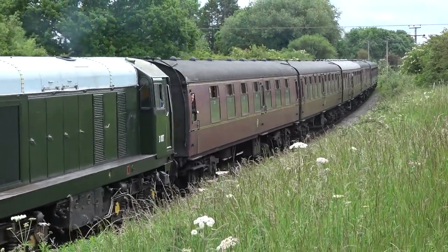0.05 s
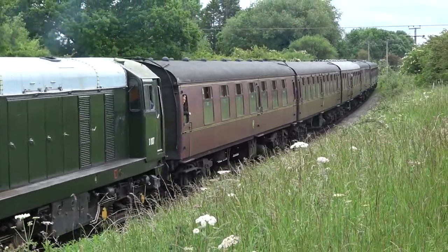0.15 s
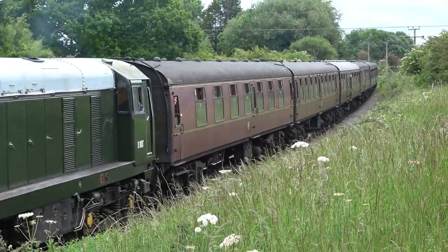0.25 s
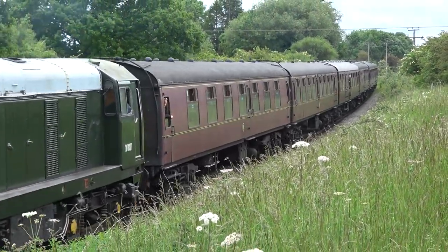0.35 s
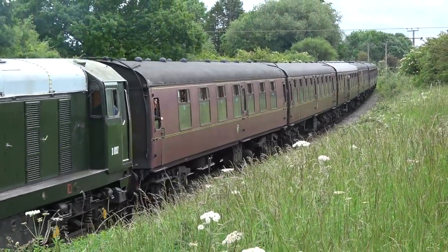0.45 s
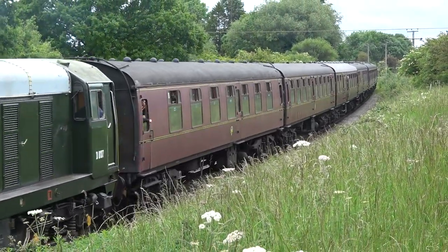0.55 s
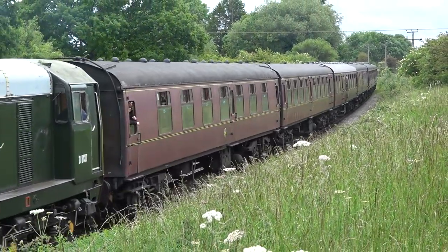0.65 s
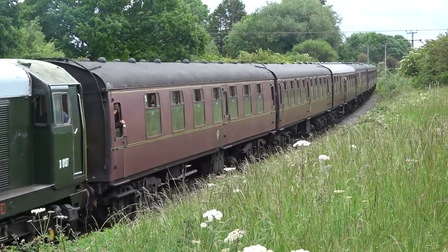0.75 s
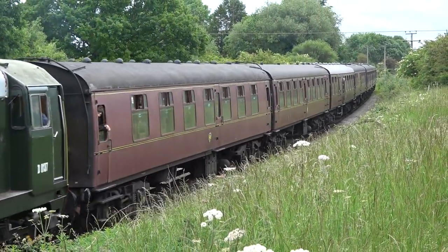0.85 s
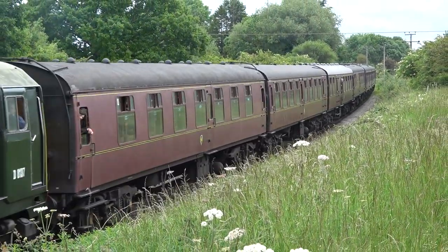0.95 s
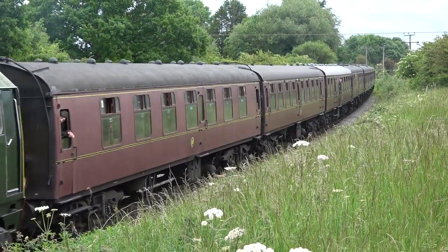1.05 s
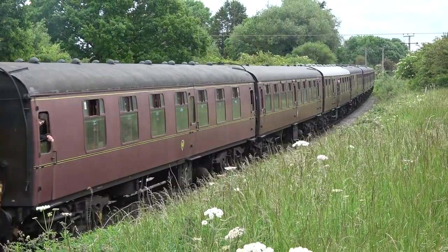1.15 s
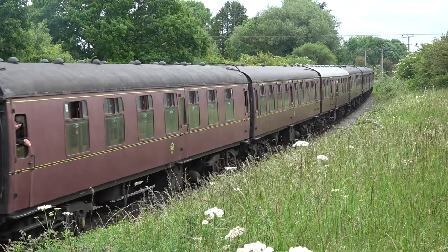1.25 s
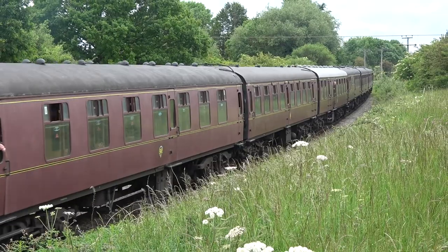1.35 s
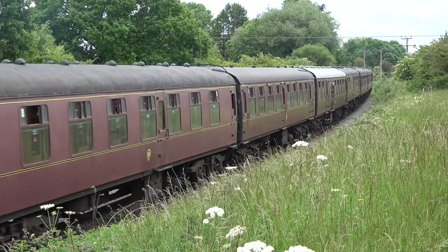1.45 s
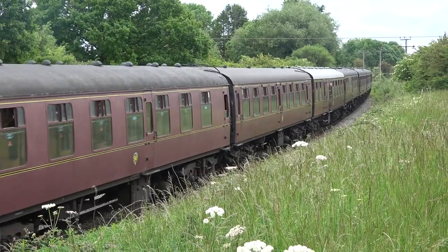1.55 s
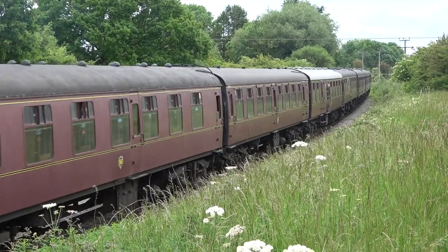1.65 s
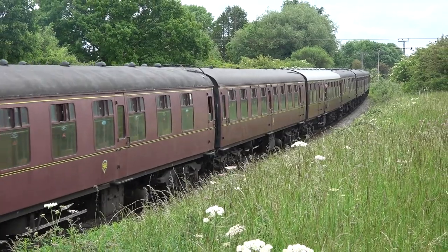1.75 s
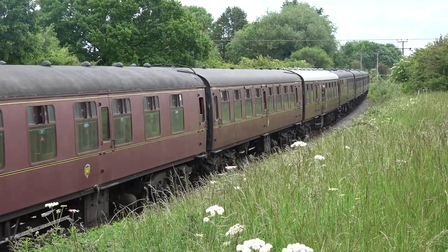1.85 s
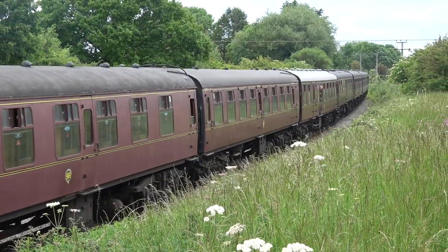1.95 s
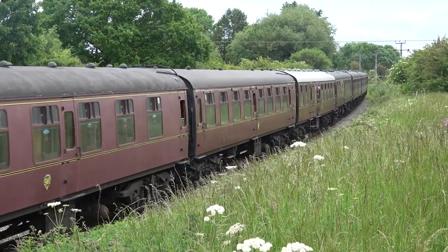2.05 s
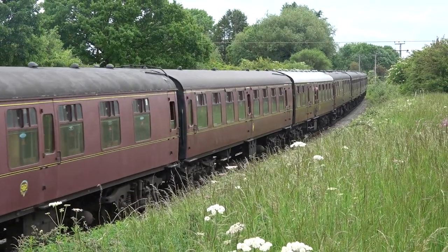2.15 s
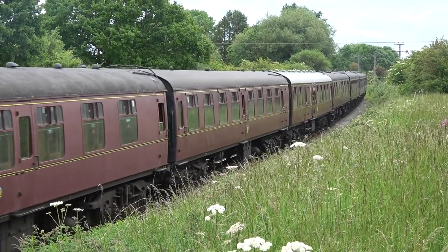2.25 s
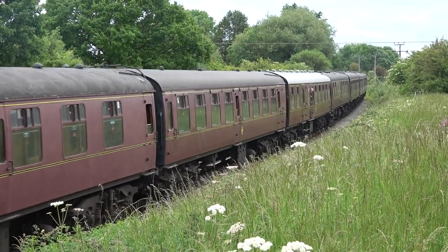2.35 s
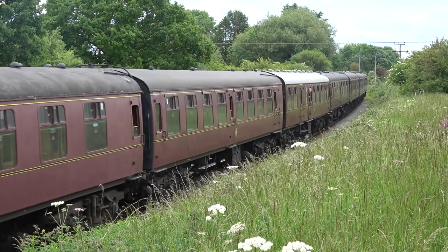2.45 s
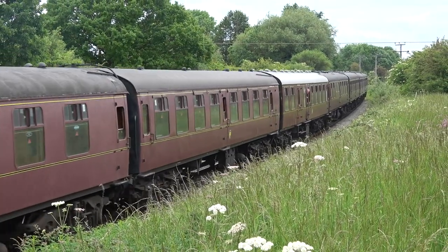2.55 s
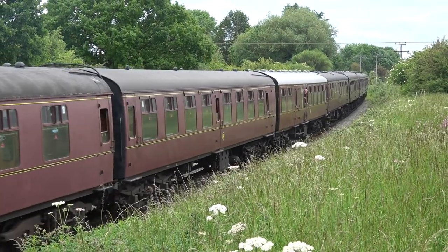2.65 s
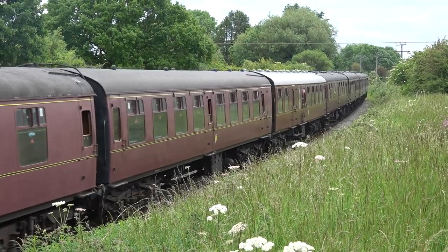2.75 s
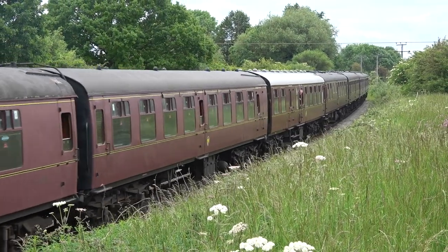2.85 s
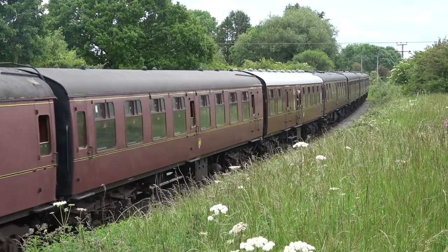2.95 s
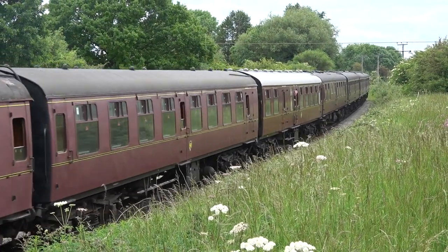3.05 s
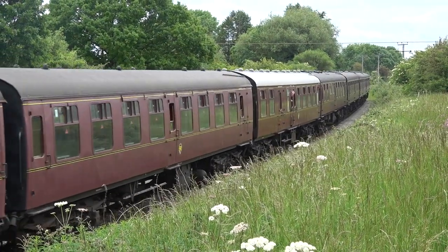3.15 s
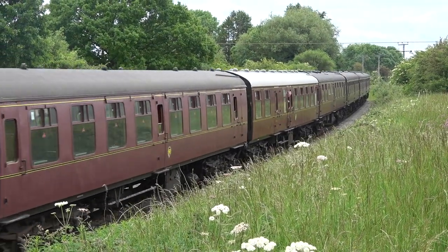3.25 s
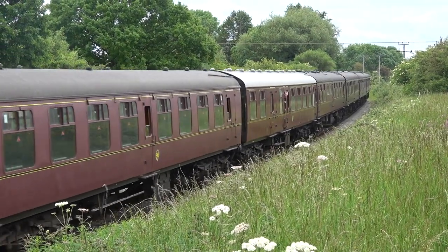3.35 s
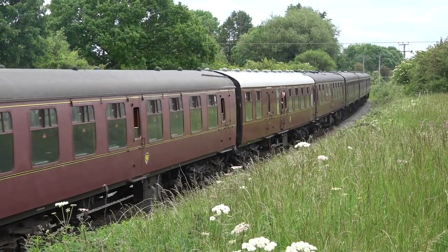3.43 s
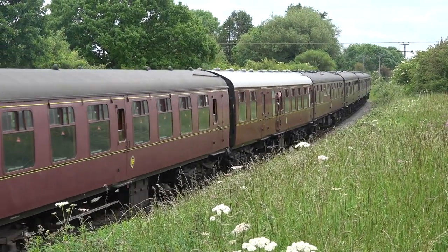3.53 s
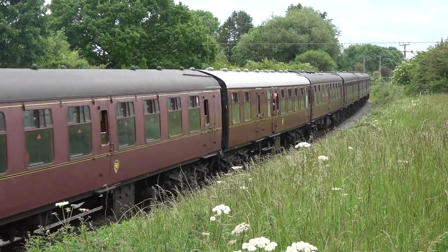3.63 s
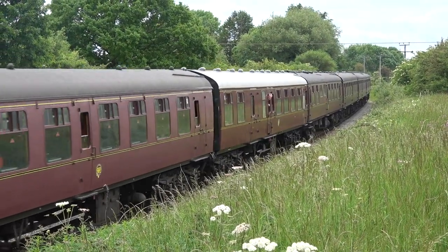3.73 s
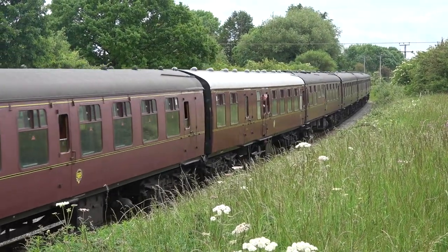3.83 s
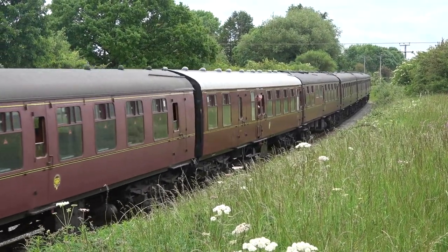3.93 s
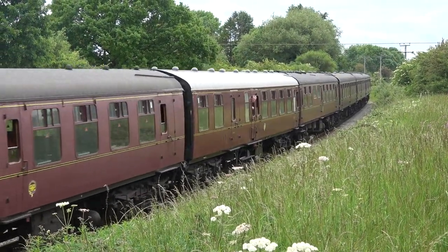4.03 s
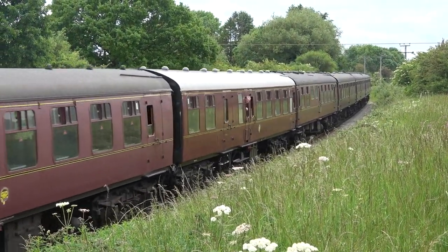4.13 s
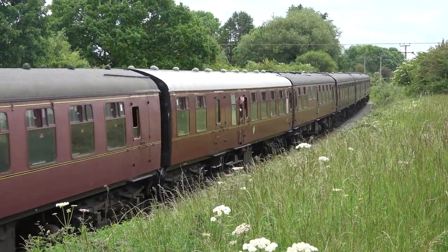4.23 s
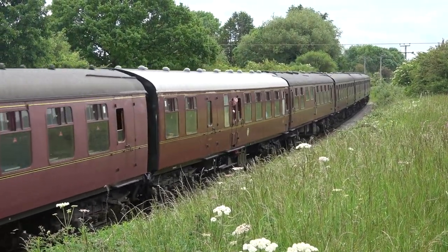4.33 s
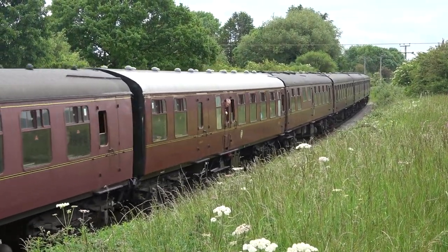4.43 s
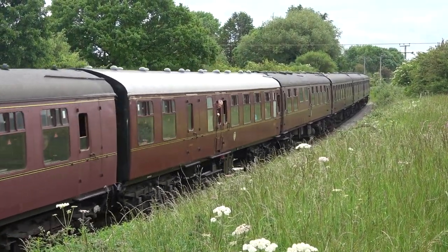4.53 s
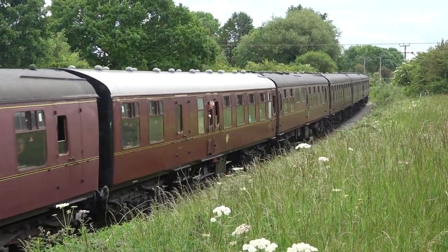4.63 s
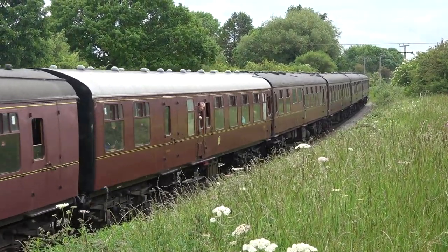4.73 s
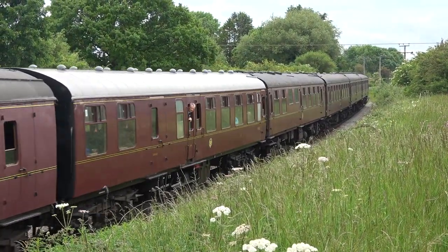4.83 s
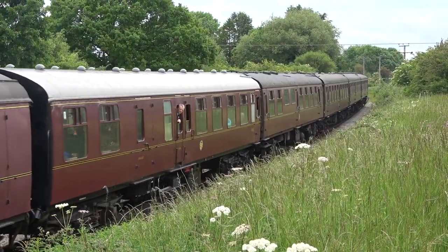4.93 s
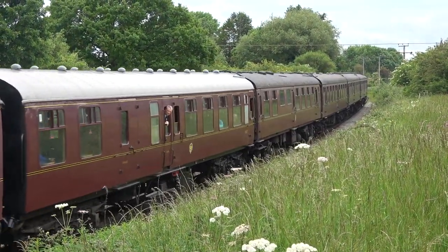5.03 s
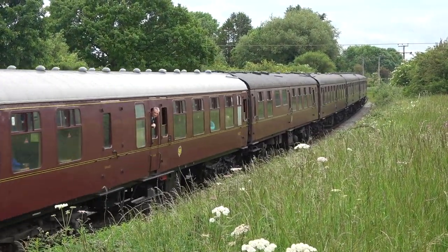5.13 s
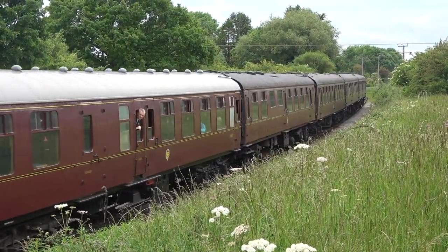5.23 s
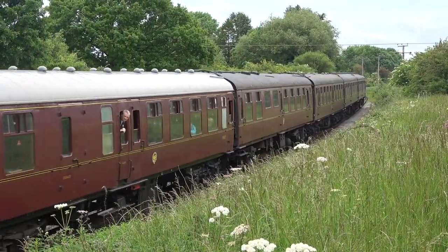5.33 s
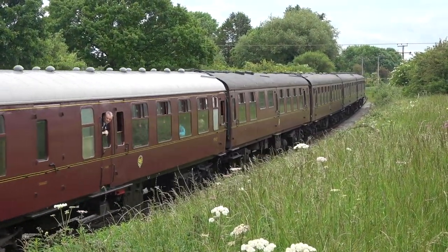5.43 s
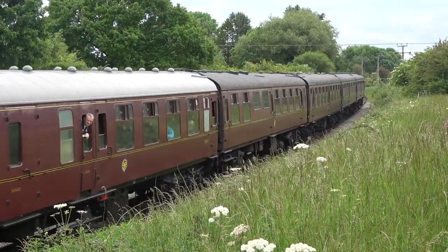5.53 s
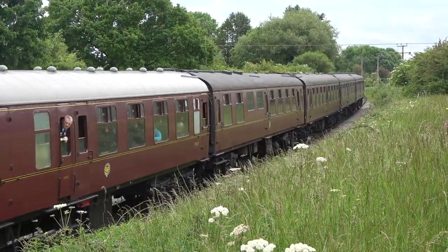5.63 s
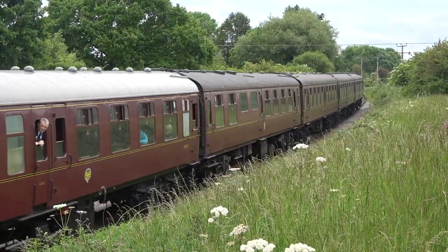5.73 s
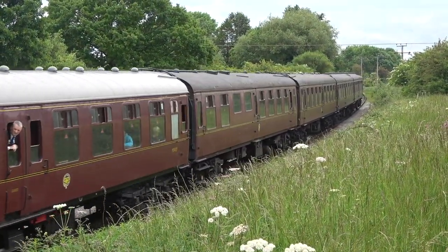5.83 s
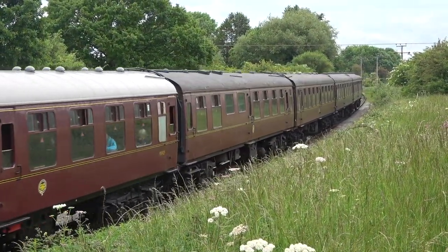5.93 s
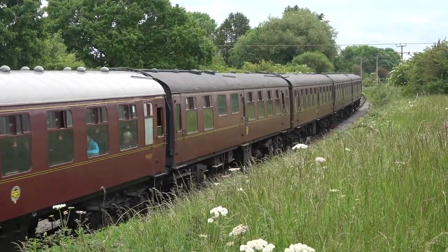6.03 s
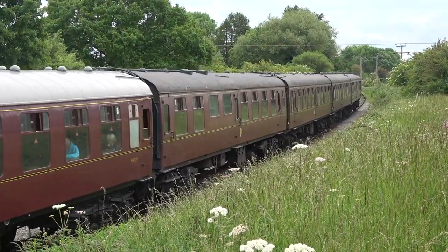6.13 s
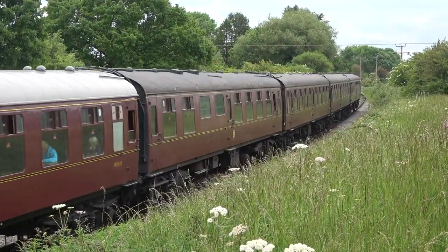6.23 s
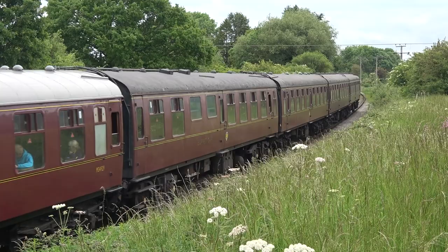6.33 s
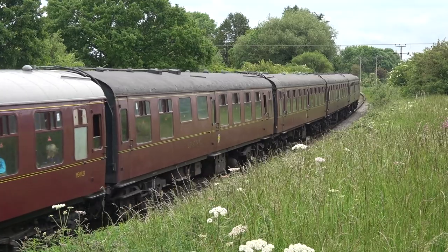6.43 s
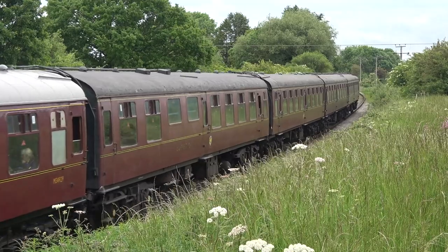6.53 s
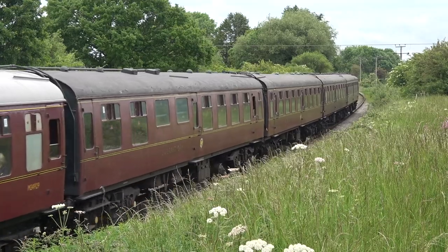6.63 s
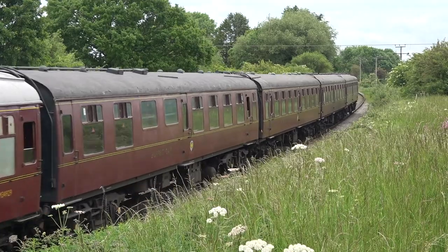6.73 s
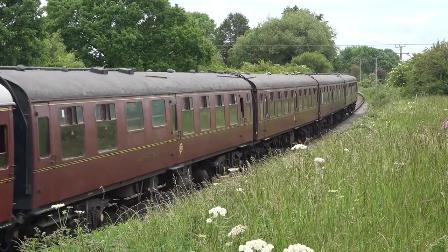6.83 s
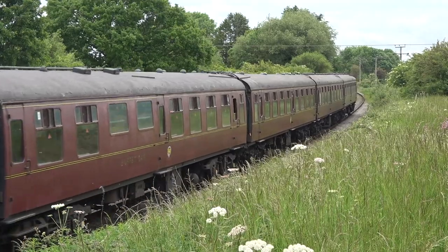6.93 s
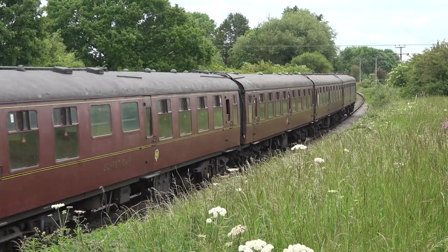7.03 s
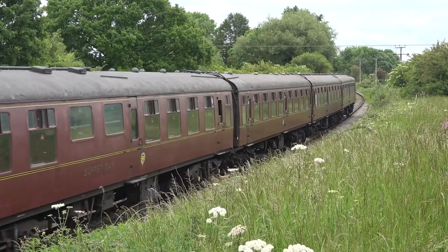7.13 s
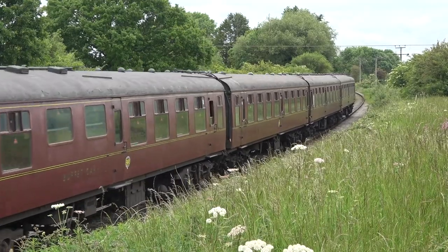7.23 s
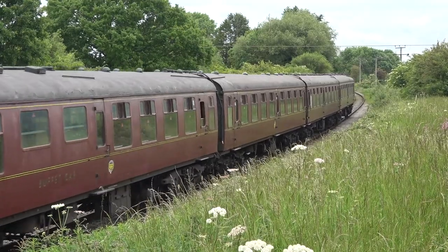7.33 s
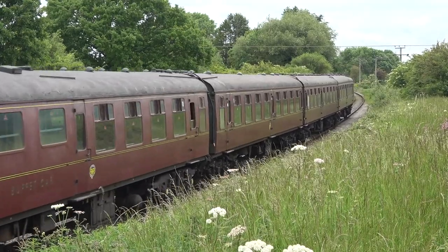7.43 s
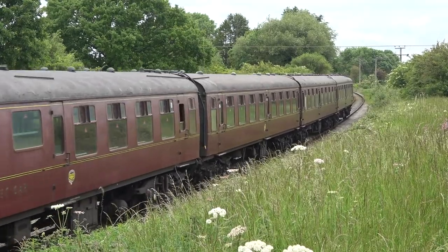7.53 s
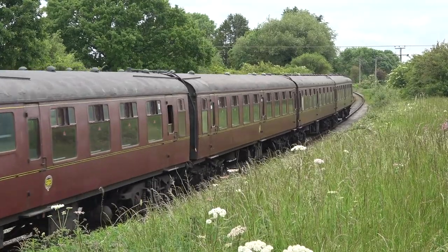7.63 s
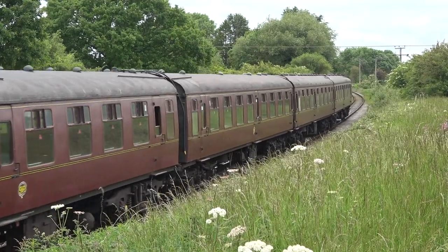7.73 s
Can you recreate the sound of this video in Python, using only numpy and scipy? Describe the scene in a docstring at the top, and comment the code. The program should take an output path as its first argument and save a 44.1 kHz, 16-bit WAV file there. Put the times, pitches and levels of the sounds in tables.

```python
"""An eight-cylinder diesel locomotive pulls hard past a grassy bank and draws away. Its exhaust is a
periodic pulse train: the pipe booms at harmonics of the engine cycle, and each puff of turbulent gas
chugs, barks and hisses. The same pulses modulate the blade tone of the turbocharger as it winds up.
The engine fades and the coaches follow: rough treads excite a rumble, wheels strike a rail joint,
and stick-slip friction makes a flange sing thinly in the curve."""
import sys
import numpy as np
from scipy import signal
from scipy.fft import rfft, irfft, next_fast_len
from scipy.io import wavfile
from scipy.ndimage import uniform_filter1d, minimum_filter1d, map_coordinates

SR = 44100
rng = np.random.default_rng(int(sys.argv[2]) if len(sys.argv) > 2 else 0)


def transcribe(signal):
    """Save signal, clipped to [-1, 1], as a 16-bit WAV file at the path in sys.argv[1]."""
    frames = np.atleast_2d(signal).T
    limited = np.clip(frames, -1, 1)
    pcm = np.round(limited * 32767).astype(np.int16)
    wavfile.write(sys.argv[1], SR, pcm)


N = 342657
TIME = np.arange(N) / SR

# Levels in the tables are relative.
# rubs of the flange on the rail: start_s, length_s, squeal_db, scrape_db
FLANGE_RUBS = [(5.6, .2, -74, -88), (6.92, 0.1, -62, -64), (7.238, 0.34, -54.5, -64),
               (7.454, 0.048, -54, -53.5), (7.677, 0.025, -55, -63)]
# first axle of each bogie meeting the rail joint, two bogies at each coach end: start_s, level_db
BOGIE_HITS = [(2.162, -27), (2.719, -16.5), (4.019, -7), (4.577, -9), (5.877, -5.5), (6.425, -5.5),
              (7.711, -6.5)]
# duller knocks of the running gear: start_s, level_db, clang_re_thud_db
GEAR_KNOCKS = [(3.861, -15.5, -26), (4.428, -12.5, -51), (4.733, -22, -50), (5.042, -24, -20),
               (5.338, -19.5, -39), (5.846, -27, -29), (6.276, -13, -44), (7.012, -16, -29),
               (7.556, -18.5, -32), (7.629, -15.5, -36)]
# blade tone of the turbocharger: time_s, pitch_hz
BLADE_PITCH = [(0, 6430), (.5, 7070), (1, 7490), (1.5, 7940), (2, 8440), (2.5, 8750), (3, 8910),
               (3.5, 9290), (4.2, 9240), (5, 9280), (5.8, 9230), (6.6, 9440), (7.7, 9700)]
# level of the treble, whistle and fizz alike: time_s, level_db
TREBLE_LEVEL = [(0, -25.5), (0.22, -29), (0.47, -22), (1.1, -33), (1.65, -36.5), (2.05, -26.5), (2.25, -27),
                (2.48, -43.5), (2.87, -35.5), (3.15, -43), (3.66, -36.5), (4.0, -46.5), (5.55, -51),
                (5.87, -44.5), (6.1, -55), (6.7, -54), (6.95, -58.5), (7.7, -61)]
# reflection of the hiss off the bank: time_s, lag_ms, strength_ratio
BANK_REFLECTION = [(2.5, 0.086, 0.36), (2.85, 0.39, 0.047), (3.3, 0.36, 0.37), (4, 0.422, 0.55),
                   (4.8, 0.31, 0.082)]
# engine speed as heard: time_s, speed_rpm
ENGINE_SPEED = [(0, 702.8), (.7, 703.4), (1.4, 709.3), (2.1, 707.9), (3, 703), (3.6, 708), (4.5, 710),
                (5.8, 702), (7.8, 707)]
# exhaust puffs in one cycle of two crank turns: crank_deg, level_db
FIRING_PATTERN = [(139, -3.5), (195, -6.5), (321, -1), (380, -7.5), (496, -2.5), (551, -6), (670, -1.5),
                  (735, -5.5)]
# strong tones of the exhaust pipe, at multiples of the cycle rate: harmonic_number, level_db
PIPE_HARMONICS = [(8, -13), (9, -21), (11, -13), (12, 1.5), (14, -13), (15, -2.5), (16, 0), (17, -36),
                  (18, 1.5), (19, -2), (21, 0.5), (23, 2.5), (24, -9.5), (26, -6), (28, -3), (31, -3),
                  (33, -6), (45, -18), (49, -13), (66, -13.5), (75, -16)]
# level of the exhaust's bark: time_s, level_db
BARK_ENVELOPE = [(0, -27.5), (0.18, -28), (0.5, -28), (1.0, -27), (1.35, -25), (1.88, -23.5), (2.3, -33),
                 (2.7, -23), (3.08, -29), (3.3, -33.5), (3.6, -36.5)]

# spectra of wheel and rail: frequency_hz, density_db
SQUEAL_SPECTRUM = [(11000, -24), (12100, -8), (12700, -5), (13300, -10), (14200, -24), (15500, -28)]  # singing flange
SCRAPE_SPECTRUM = [(4000, -23), (7000, 1), (11500, 3), (13000, -12), (15500, -18)]  # dry friction of the flange
RUMBLE_SPECTRUM = [(15, -64), (25, -43), (36, -57), (49, -10.5), (81, -10.5), (124, -4.5), (157, -5),
                   (184, 0), (237, 0), (346, -4), (387, -11), (439, -9.5), (557, -17.5), (1100, -36.5),
                   (1430, -55), (2420, -120)]  # rolling bogies
ROAR_SPECTRUM = [(300, -17.5), (700, 7.5), (1080, 2), (1330, 8), (1550, 1.5), (1820, 6.5), (2250, -0.5),
                 (2650, 3), (3150, 3), (4200, -5.5), (5500, -13), (7500, -21), (10500, -22), (15000, -57)]  # vibrating rails
THUD_SPECTRUM = [(30, -39.5), (90, -19.5), (170, -10.5), (200, -4), (238, -1.5), (290, -1), (350, -8),
                 (388, -3.5), (435, -13.5), (520, -20), (800, -27), (1500, -43), (5000, -71.5)]  # jolted bogie
CLANG_SPECTRUM = [(400, -12.5), (750, 8), (1080, -1), (1330, 6.5), (1560, -3.5), (1820, 8.5), (2050, 3.5),
                  (2900, 1), (4200, -6.5), (6000, -16.5), (9000, -31), (14000, -65)]  # struck wheel and rail
# spectra of the exhaust gas: frequency_hz, density_db
FIZZ_SPECTRUM = [(4000, 0.5), (7000, 11.5), (10500, -1), (13000, -2), (15500, -9)]  # highest band of the jet
HISS_SIDE_SPECTRUM = [(900, -17.5), (1700, -7), (2300, -3.5), (2900, 2), (3500, -3.5), (4250, -9),
                      (4680, -9), (5200, -13.5), (7500, -25.5), (10000, -19.5), (15000, -74)]  # jet from the side
HISS_REAR_SPECTRUM = [(1500, -40), (2400, -9.5), (3200, 4), (3550, 1), (4300, -3), (4850, -5), (5500, -9),
                      (6800, -20.5), (8000, -11.5), (15000, -38.5)]  # jet from behind
BARK_SIDE_SPECTRUM = [(300, -19), (550, -0.5), (780, -7.5), (950, -0.5), (1300, -4), (1800, -5),
                      (2600, -9.5), (5000, -47.5)]  # turbulent puff from the side
BARK_REAR_SPECTRUM = [(300, -25), (520, 3), (720, -4), (900, 4.5), (1300, -6), (1550, -2.5), (1730, 0),
                      (2050, -8), (2600, -13), (5000, -41.5)]  # turbulent puff from behind
CHUG_SPECTRUM = [(20, -48), (55, -7), (110, 7), (180, 4.5), (280, 0), (400, -1), (550, -10), (800, -11.5),
                 (1500, -60), (4000, -100)]  # low push of a puff


def amp(db):
    """Amplitude ratio of a level in decibels."""
    return 10 ** (np.asarray(db) / 20)


def unit(x):
    """Normalisation to rms 1."""
    return x / np.sqrt(np.mean(x ** 2) + 1e-20)


def curves(rows):
    """Linear interpolation: one value per sample for each column after the time."""
    times, *columns = np.transpose(rows)
    return [np.interp(TIME, times, column) for column in columns]


def wobble(rate_hz):
    """Smooth random modulation: a spline through rate_hz random knots a second."""
    return map_coordinates(rng.standard_normal(int(N * rate_hz / SR) + 4), [TIME * rate_hz])


def delayed(x, lag_s):
    """Pure time delay."""
    return np.pad(x, (round(lag_s * SR), 0))[:N]


def colour(x, spectrum):
    """Minimum-phase filter: folding the cepstrum gives a causal response with the given spectrum."""
    size = 2 * next_fast_len(N // 2 + SR // 4)
    hz, db = np.transpose(spectrum)
    gain = amp(np.interp(np.log(np.fft.rfftfreq(size, 1 / SR) + 1), np.log(hz), db))
    cepstrum = irfft(np.log(gain), size)
    cepstrum[1:size // 2] *= 2
    cepstrum[size // 2 + 1:] = 0
    return irfft(rfft(x, size) * np.exp(rfft(cepstrum)), size)[:N]


def noise(spectrum):
    """Filtered Gaussian noise of rms 1."""
    return unit(colour(rng.standard_normal(N), spectrum))


def impulses(times_s, sizes):
    """Impulse train: one spike for each event."""
    at = np.round(np.asarray(times_s) * SR).astype(int)
    inside = (at >= 0) & (at < N)
    return np.bincount(at[inside], np.asarray(sizes)[inside], N)


def bursts(spikes, rise_s, fall_s):
    """Convolution: each spike becomes a swell of its own height that decays exponentially."""
    t = TIME[:SR // 2]
    shape = (1 - np.exp(-t / rise_s)) * np.exp(-t / fall_s)
    return signal.fftconvolve(spikes, shape / shape.max())[:N]


def puffs(spikes, rise_s, fall_s, steady, scatter_db):
    """Pulsating flow of rms 1: rounded swells of uneven strength over a steady stream."""
    swells = bursts(spikes * amp(scatter_db * rng.standard_normal(N)), rise_s, fall_s)
    return unit(steady + uniform_filter1d(swells, size=280))


def from_behind(start_s=1.85, length_s=0.84):
    """Directivity crossfade: 0 while the locomotive is heard from the side, 1 from behind."""
    return np.clip((TIME - start_s) / length_s, 0, 1)


def receding(near_db, rear_db, drop_db, drop_s, ramp_s, fade_db_per_s):
    """Amplitude envelope: the engine holds its level, then drops and fades as it draws away."""
    dropped = (1 + np.tanh((TIME - drop_s) / ramp_s)) / 2
    fade_db = fade_db_per_s * np.maximum(TIME - drop_s, 0)
    swell_db = 11 * np.exp(-((TIME - 5.85) / 0.057) ** 2)  # the distant engine swells once, briefly
    return amp(near_db + rear_db * from_behind() - drop_db * dropped - fade_db + swell_db)


def flange(pitch_hz=12730, attack_s=0.017, release_s=0.037):
    """Stick-slip friction: a flange rubs the rail in the curve, a thin squeal over a dry scrape."""
    hz = pitch_hz + 130 * wobble(45) + 150 * wobble(600)
    note = unit(np.sin(2 * np.pi * np.cumsum(hz) / SR))
    squeal = noise(SQUEAL_SPECTRUM) + amp(-6 + 4.3 * wobble(20)) * note
    scrape = noise(SCRAPE_SPECTRUM)
    rubs = np.zeros(N)
    for start_s, length_s, squeal_db, scrape_db in FLANGE_RUBS:
        attack = np.clip((TIME - start_s) / attack_s, 0, 1)
        release = np.exp(-np.maximum(TIME - start_s - length_s, 0) / release_s)
        rubs += attack * release * (amp(squeal_db) * squeal + amp(scrape_db) * scrape)
    return rubs * amp(1.2 * wobble(100))


def rolling(knocks_per_s=97, rumble_db=-25.0, roar_db=-35.5, roar_fade_db_per_s=1.0):
    """Roughness excitation: treads shake the bogies and make the rails roar, swelling as each passes."""
    abeam_s = np.transpose(BOGIE_HITS)[0] + 0.15  # a bogie's middle passes just after its first axle
    near_s = 0.32  # distance to the track over train speed
    intensities = 1 / (1 + ((TIME - abeam_s[:, None]) / near_s) ** 2)  # inverse-square law
    nearness = np.sqrt(intensities.sum(axis=0))
    when, force = rng.random((int(knocks_per_s * N / SR), 2)).T
    knocks = unit(colour(impulses(when * N / SR, force - .5), THUD_SPECTRUM))
    rumble = amp(rumble_db) * nearness * (noise(RUMBLE_SPECTRUM) + amp(-5.5) * knocks)
    roar_gain = amp(roar_db - roar_fade_db_per_s * TIME + wobble(25)) * nearness ** 0.46
    return rumble + roar_gain * noise(ROAR_SPECTRUM)


def rail_joint(axle_lag_s=.239, rebound_s=.035, rebound_db=-12, clang_db=-25):
    """Impact excitation: each axle thuds and clangs at the gap; the running gear shudders and knocks."""
    hit_s, hit_db = np.transpose(BOGIE_HITS)
    knock_s, knock_db, knock_clang_db = np.transpose(GEAR_KNOCKS)
    wheels = impulses(hit_s, amp(hit_db)) + impulses(hit_s + axle_lag_s, amp(hit_db))
    rebounds = amp(rebound_db) * delayed(wheels, rebound_s)  # the bogie drops back on its springs
    blows = delayed(wheels + rebounds + impulses(knock_s, amp(knock_db)), lag_s=0.00237)
    clangs = amp(clang_db) * wheels + impulses(knock_s, amp(knock_db + knock_clang_db))
    response_peak = abs(colour(impulses([0], [1]), THUD_SPECTRUM)).max()
    thud = colour(blows, THUD_SPECTRUM) / response_peak
    shudder = bursts(blows, rise_s=0.0019, fall_s=0.035) * noise(THUD_SPECTRUM)
    strike = amp(3.5) * bursts(clangs, rise_s=0.00077, fall_s=0.0065)
    ring = amp(-6.5) * bursts(clangs, rise_s=0.011, fall_s=0.07)
    return amp(3.5) * thud + amp(-12.0) * shudder + (strike + ring) * noise(CLANG_SPECTRUM)


def firings(cycle, scatter_db, jitter_s):
    """Nearly periodic excitation: a spike for each exhaust valve that opens, each a little different."""
    degrees, db = np.transpose(FIRING_PATTERN)
    due = (np.arange(-1, int(cycle[-1]) + 1)[:, None] + degrees / 720).ravel()
    timing, strength = rng.standard_normal((len(due), 2)).T
    times_s = np.interp(due, cycle, TIME, left=-1, right=-1) + jitter_s * timing
    return impulses(times_s, amp(np.resize(db, len(due)) + scatter_db * strength))


def accented(cycle, spikes, accent_db, full_s=7.8):
    """Amplitude modulation at crank rate: the hardest puff of each turn stands out more with time."""
    hardest = FIRING_PATTERN[2][0] / 720
    depth_db = accent_db * np.minimum(TIME / full_s, 1)
    return spikes * amp(depth_db * np.cos(4 * np.pi * (cycle - hardest)))


def turbulence(side_spectrum, rear_spectrum, patchy_db=2.5):
    """Directional gas noise: its colour flickers at random and turns from the side to the rear."""
    angle = from_behind() * np.pi / 2
    gas = np.cos(angle) * noise(side_spectrum) + np.sin(angle) * noise(rear_spectrum)
    frames = signal.stft(gas, nperseg=512)[2]
    patches = uniform_filter1d(rng.standard_normal(frames.shape), size=4, axis=0)  # across frequency
    patches = unit(uniform_filter1d(patches, size=6, axis=1))  # across time
    return unit(signal.istft(frames * amp(patchy_db * patches), nperseg=512)[1][:N])


def turbocharger(spikes, sag_hz=484, blur_hz=157.6, flutter_db=4.0, skirt_hz=561):
    """Modulation of a blade tone: it leaves through the exhaust, louder and flatter with each puff."""
    pitch_hz, = curves(BLADE_PITCH)
    treble_db, = curves(TREBLE_LEVEL)
    puff = puffs(spikes, rise_s=0.00116, fall_s=.006, steady=0.069, scatter_db=1.0)
    plume = np.interp(TIME, [1.5, 3], [.6, 1.15])  # from behind, the tone crosses more of the hot plume
    hz = pitch_hz - plume * sag_hz * np.tanh(puff / 2) + plume * blur_hz * wobble(450)
    phase = 2 * np.pi * np.cumsum(hz) / SR
    skirt = plume * wobble(2 * skirt_hz)  # turbulence scatters part of the tone into sidebands
    tone = (1 + skirt) * (np.sin(phase) + amp(-31) * np.sin(2 * phase))
    return amp(treble_db - 0.24) * unit(tone * (1 + puff) * amp(flutter_db * wobble(220)))


def stack_jet(cycle, spikes, fizz_db=-10.5, fizz_rise_db_per_s=0.4):
    """Two-path interference: pulsed jet hiss meets its inverted, grazing reflection off the bank."""
    treble_db, = curves(TREBLE_LEVEL)
    lag_ms, strength = curves(BANK_REFLECTION)
    gain = receding(near_db=-32, rear_db=3, drop_db=17.5, drop_s=3.92, ramp_s=0.62, fade_db_per_s=3)
    # from the side, the hiss follows a share of the treble's swing
    swing_db = 0.22 * (1 - from_behind()) * (treble_db - treble_db[0] + 3.0)
    beats = accented(cycle, spikes, accent_db=2.5) ** 1.36
    flow = puffs(beats, rise_s=0.0011, fall_s=0.0048, steady=0.27, scatter_db=3.2)
    hiss = gain * amp(swing_db) * flow * turbulence(HISS_SIDE_SPECTRUM, HISS_REAR_SPECTRUM)
    reflection = map_coordinates(hiss, [(TIME - lag_ms / 1000) * SR])
    fizz = amp(treble_db + fizz_db + fizz_rise_db_per_s * TIME) * noise(FIZZ_SPECTRUM)
    fizz *= puffs(spikes, rise_s=.001, fall_s=0.0034, steady=0.15, scatter_db=3.5)
    return hiss - strength * reflection + fizz


def exhaust_boom(cycle, lead_cycles=.012, waver_db=2.35, peak_s=1.24, fall_db_per_s=1.5):
    """Fourier series: the pipe's deep tones are cycle harmonics, phased by the firing pattern."""
    degrees, db = np.transpose(FIRING_PATTERN)
    tones = np.zeros(N)
    for harmonic, level_db in PIPE_HARMONICS:
        coefficient = np.sum(amp(db) * np.exp(-2j * np.pi * harmonic * degrees / 720))
        phase = 2 * np.pi * harmonic * (cycle + lead_cycles) + np.angle(coefficient)
        tones += amp(level_db + waver_db * wobble(5.27)) * np.cos(phase)
    gain = receding(near_db=-15, rear_db=0, drop_db=15.5, drop_s=3.39, ramp_s=0.42, fade_db_per_s=.1)
    carry = amp(-fall_db_per_s * abs(TIME - peak_s))  # the deep tones carry best at peak_s
    return gain * carry * unit(tones)


def exhaust_chug(spikes, flow, lead_s=0.00497):
    """Pressure pulse: the front of each puff outruns the churning gas, and both give a low push."""
    fronts = colour(np.roll(spikes ** 1.7, -round(lead_s * SR)), CHUG_SPECTRUM)
    churn = colour((.5 + flow) * rng.standard_normal(N), CHUG_SPECTRUM)
    gain = receding(near_db=-21, rear_db=2, drop_db=13.5, drop_s=3.33, ramp_s=0.44, fade_db_per_s=5)
    return gain * (amp(-2.5) * unit(fronts) + amp(-2.0) * unit(churn))


def exhaust_bark(cycle, spikes, flow, split_hz=1200, fade_db_per_s=7.7):
    """Turbulent jet noise: each puff barks, brightening as the gas gathers speed."""
    gas = turbulence(BARK_SIDE_SPECTRUM, BARK_REAR_SPECTRUM)
    dull = signal.sosfiltfilt(signal.butter(3, split_hz, fs=SR, output="sos"), gas)
    bright = gas - dull
    beats = accented(cycle, spikes, accent_db=1.0) ** 1.8
    crest = amp(0.7) * puffs(beats, rise_s=0.0055, fall_s=0.003, steady=0.15, scatter_db=1.4)
    level_db, = curves(BARK_ENVELOPE)
    fade_db = fade_db_per_s * np.maximum(TIME - BARK_ENVELOPE[-1][0], 0)
    return amp(level_db - 0.6 - fade_db) * (flow * dull + crest * bright)


def scene():
    """Superposition: the coaches add to the engine sounds, which all keep time with one crankshaft."""
    speed_rpm, = curves(ENGINE_SPEED)
    cycle = np.cumsum(speed_rpm) / (120 * SR)  # engine cycles elapsed, two crank turns each
    spikes = firings(cycle, scatter_db=1.55, jitter_s=0.0004)
    whistle = turbocharger(spikes)
    hiss = stack_jet(cycle, spikes)
    wheels = rolling()
    boom = exhaust_boom(cycle)
    flow = puffs(spikes ** 1.5, rise_s=0.001, fall_s=0.0035, steady=0.17, scatter_db=0.5)
    exhaust = boom + exhaust_chug(spikes, flow) + exhaust_bark(cycle, spikes, flow)
    return (rail_joint() + flange() + wheels + whistle + hiss + exhaust)[None]


def record(dry):
    """Peak and band limiting: a fast gain dip holds the peaks down, then a low-pass cuts the top."""
    ceiling, top_hz = .52, 15800
    needed = np.minimum(1, ceiling / (abs(dry) + 1e-9))
    gain = uniform_filter1d(minimum_filter1d(needed, size=133), size=133)  # 3 ms windows
    size = next_fast_len(N + SR // 4)
    passband = np.fft.rfftfreq(size, 1 / SR) < top_hz
    return irfft(rfft(dry * gain, size) * passband, size)[:, :N]


dry = scene()
out = record(dry)
transcribe(out)
```